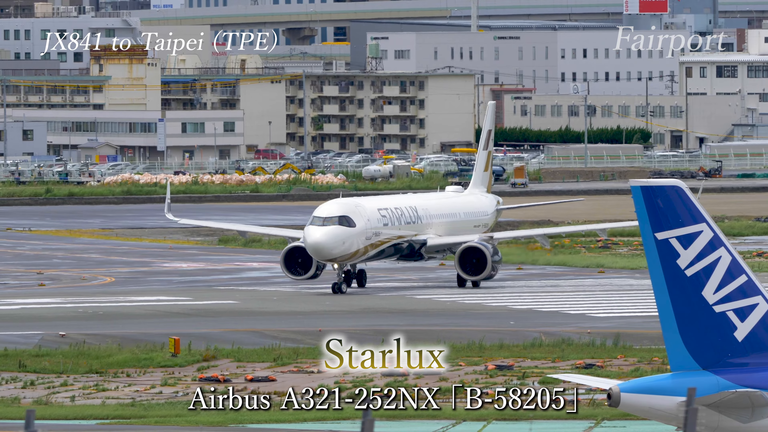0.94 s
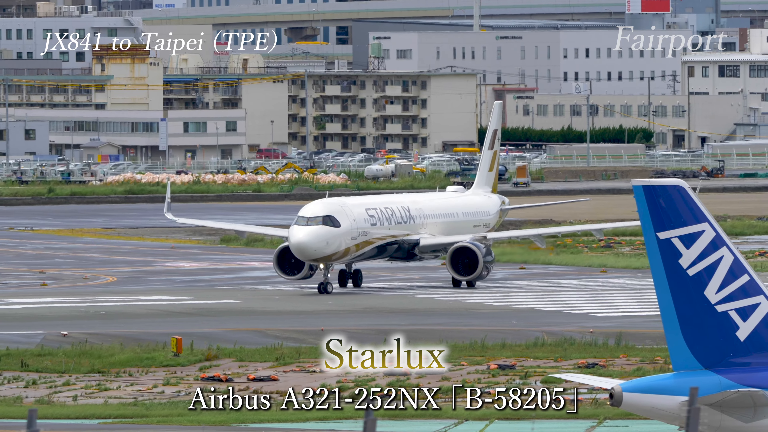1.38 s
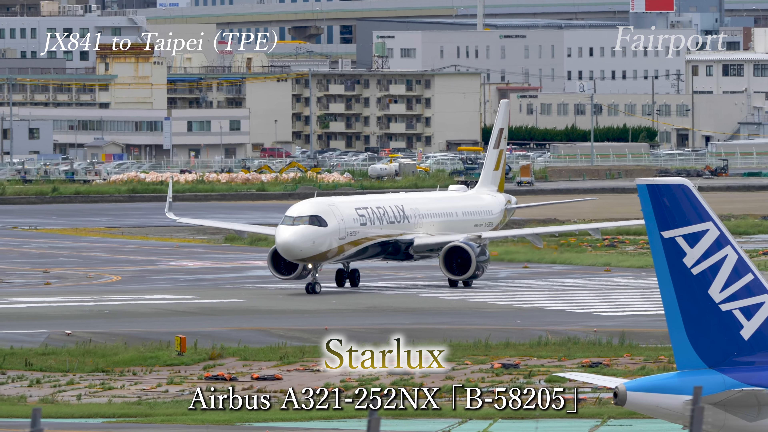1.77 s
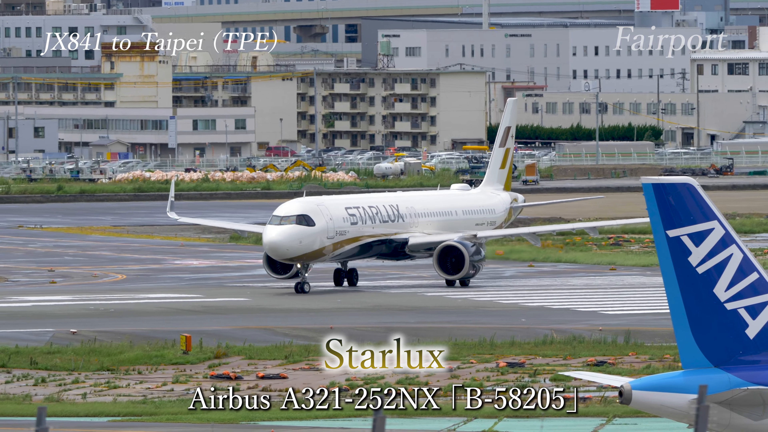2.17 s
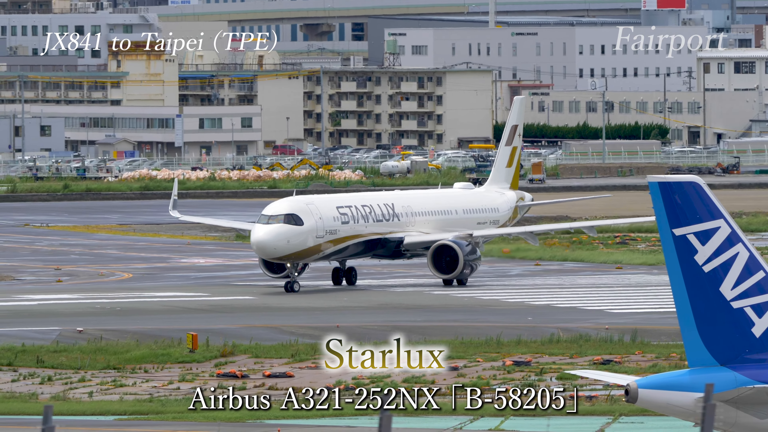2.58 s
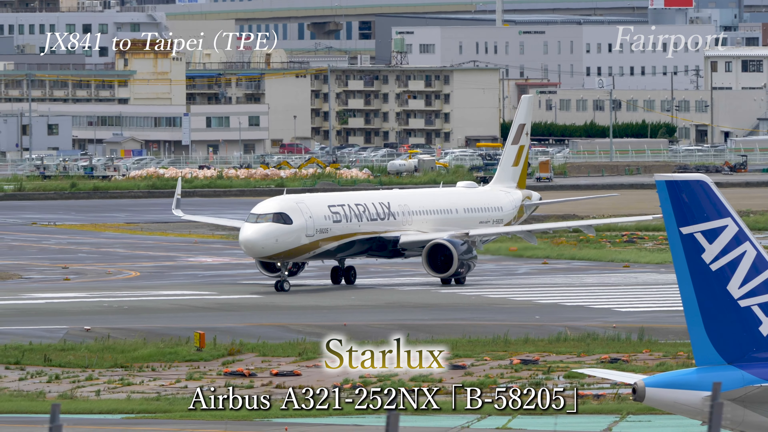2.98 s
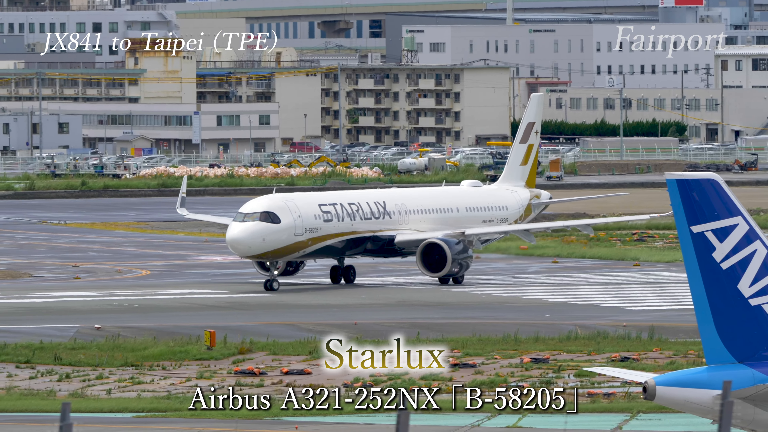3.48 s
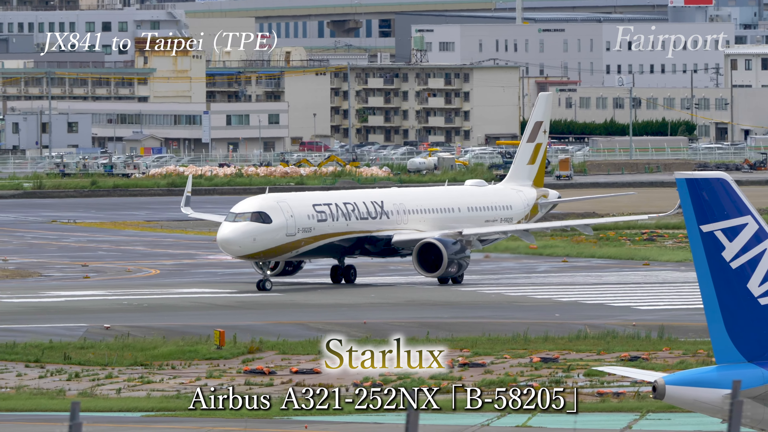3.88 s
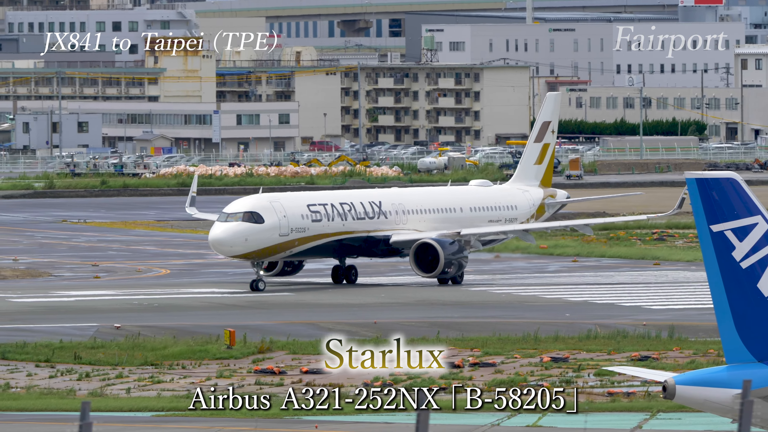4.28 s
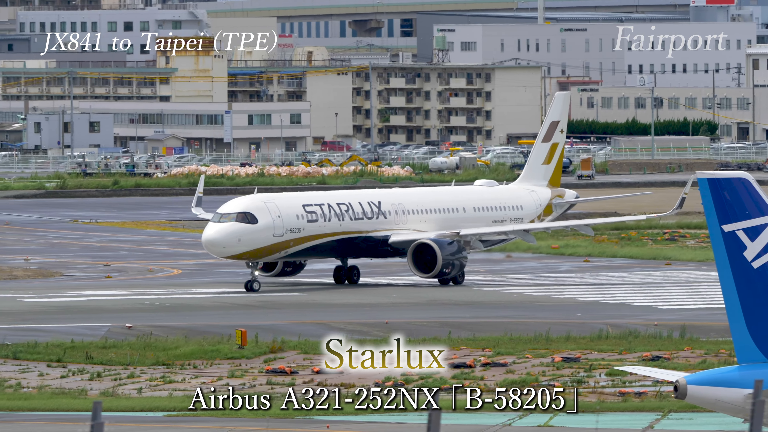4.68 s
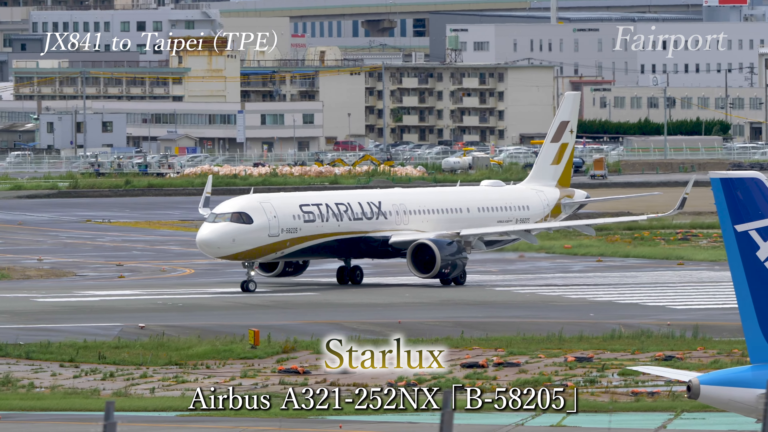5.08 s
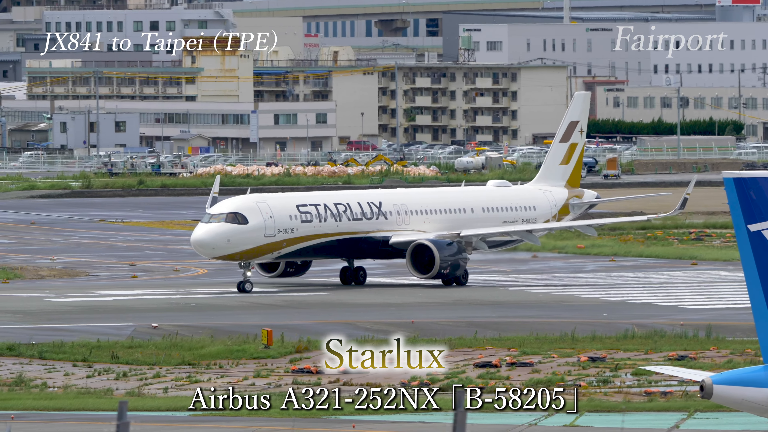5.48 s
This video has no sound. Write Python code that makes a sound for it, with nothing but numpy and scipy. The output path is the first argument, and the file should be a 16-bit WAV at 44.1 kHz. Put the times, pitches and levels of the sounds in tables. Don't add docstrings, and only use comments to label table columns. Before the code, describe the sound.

Outdoor distant stereo pickup of turbofan engines at taxi power: rough roar, bright hiss, wavering hollow howl, flickering whine and a faint low hum. A strong gust flutters and booms in the first second, briefly pushing the jet down. Lighter buffets follow until mid-clip, then the jet noise continues, slightly stronger and hissier at the end, wide and phasey.

```python
import sys
import numpy as np
from scipy import signal
from scipy.io import wavfile
from scipy.ndimage import uniform_filter1d

SR = 44100
rng = np.random.default_rng(int(sys.argv[2]) if len(sys.argv) > 2 else 0)


def to_linear_factor(level_db):
    exponent = np.asarray(level_db, float) / 20
    return 10 ** exponent


def wrap_up_sound(samples):
    columns = np.atleast_2d(samples).T
    tamed = np.clip(columns, -1, 1)
    steps = np.round(tamed * 32767).astype(np.int16)
    wavfile.write(sys.argv[1], SR, steps)


N = 253134


# (time [s], hiss level [dB], roar over hiss [dB])
JET_LOUDNESS = [(0, -22, 1.5), (1.0, -22, -0.5), (1.56, -21.5, 2.3), (2.05, -23, 2), (2.42, -21.5, 3.5),
                (3.04, -20, 0.2), (3.5, -21.5, 4), (3.75, -20.5, 1.5), (4.3, -23, 1.4), (4.96, -21, 3),
                (5.4, -19.5, -0.4), (5.74, -20, 1)]
# (frequency [Hz], density [dB per Hz])
ROAR_SPECTRUM = [(20, -49), (60, -16.5), (160, -10.5), (205, -5.5), (240, -3), (330, -5), (450, 1),
                 (540, 1), (600, 1.5), (720, 0.5), (880, -3), (990, -18), (1300, -15), (3000, -110)]
# (frequency [Hz], density [dB per Hz])
HISS_SPECTRUM = [(500, -50), (1000, -8), (1400, -4), (1750, 0), (2100, -2), (2850, -4), (3200, -7),
                 (4300, -7), (5500, -16), (6800, -27), (7700, -37), (11000, -38), (12000, -49),
                 (14000, -54)]
# (frequency [Hz], likeness [0 to 1])
PORT_COHERENCE = [(60, .35), (200, .52), (520, .63), (720, .36), (880, .22), (1040, .42), (1500, .63),
                  (3000, .65), (6200, .72), (9000, .8)]


def jet():
    hiss_db, roar_over_hiss_db = curves(JET_LOUDNESS)
    roar_duck_share = 0.9
    roar_db = hiss_db + roar_over_hiss_db + roar_duck_share * duck_db()
    hiss_db = hiss_db + duck_db()
    coherence = read(PORT_COHERENCE, np.fft.rfftfreq(2048, 1 / SR))
    roar = to_linear_factor(roar_db - 0.2) * turbulence(ROAR_SPECTRUM, 0.5, coherence)
    hiss = to_linear_factor(hiss_db - 0.01) * turbulence(HISS_SPECTRUM, 1.0, coherence)
    return roar + hiss


# (frequency [Hz], left over right [dB])
PORT_LEAN = [(60, 5), (400, 0), (730, -0.4), (1500, -0.1), (3000, 0.1), (6200, 1.3)]


def turbulence(spectrum, patchy_db, coherence, lead_rad=0.05):
    frames, hz = N // 512 + 5, np.fft.rfftfreq(2048, 1 / SR)
    a, b, c, d, patches = rng.standard_normal((frames, 1025, 5)).T
    patches = uniform_filter1d(patches, size=14, axis=0)
    patches = uniform_filter1d(patches, size=9, axis=1)
    coherence = np.clip(coherence, -1, 1)[:, None]
    left = a + 1j * b
    right = coherence * left * np.exp(1j * lead_rad) + np.sqrt(1 - coherence ** 2) * (c + 1j * d)
    field = np.array([left, right])
    field *= to_linear_factor(read(spectrum, hz)[:, None] + patchy_db * patches / patches.std())
    field *= to_linear_factor(np.multiply.outer([.5, -.5], read(PORT_LEAN, hz)))[:, :, None]
    x = signal.istft(field, nperseg=2048, noverlap=1536)[1][:, :N]
    return x / x.std()


# (time [s], level [dB])
HOWL_LOUDNESS = [(0, -24), (.24, -21.5), (.52, -36), (.78, -24), (1.38, -24), (1.94, -17), (2.1, -18.5),
                 (2.24, -17.5), (2.44, -23), (3.02, -25), (3.4, -21.5), (4.3, -22.5), (4.7, -21.5),
                 (4.98, -26.5), (5.2, -16), (5.38, -31.5), (5.58, -17), (5.74, -22)]
# (time [s], differing over shared [dB], lead of the shared part [rad])
HOWL_BEARING_CURVE = [(0, -5.5, -2), (.3, -8, -2.5), (.58, -17, -3.2), (.8, -7.5, -2.5), (1.4, -9, -1),
                      (2.3, -3.5, -2), (3.1, 4, -1.3), (3.9, 8, -1.7), (4.3, 6.5, -3), (4.65, -5, -2),
                      (5.74, -2, -2.5)]


def fan_howl():
    (howl_db,), (differing_over_db, lead_rad) = curves(HOWL_LOUDNESS), curves(HOWL_BEARING_CURVE)
    shared_db = howl_db - 10 * np.log10(1 + to_linear_factor(differing_over_db) ** 2)
    levels_db = (shared_db, shared_db + differing_over_db)
    return fan_tone(648.0, levels_db, lead_rad, trims_db=(1.5, 2.6), scatter=.4, width_hz=13)


# (time [s], half length [s], shared rise [dB], differing rise [dB])
WHINE_SWELLS = [(.08, 0.15, 3, 0), (.6, .06, -2, 10), (.88, 0.2, -4, 7.5), (1.13, 0.095, 2, 12.5),
                (1.6, 0.12, 1, 4), (2.2, .25, -7, -1.5), (2.56, .12, 2, 8), (2.83, .09, -3, 6),
                (3.15, 0.055, -1, 8), (3.38, 0.067, 5, 7), (3.72, 0.11, 0, 12.5), (3.97, 0.13, 3, 16),
                (4.12, 0.048, 8, 6), (4.42, 0.11, -2, 7.5), (4.75, .12, 5, 2), (4.9, 0.075, 0, 7),
                (5.16, 0.15, 1, -6), (5.6, 0.22, 4, 1.5)]


def blade_whine():
    sag_from_s, sag_hz_per_s = 4.0, 5.5
    blades_hz = 2803.5 - sag_hz_per_s * np.maximum(np.arange(N) / SR - sag_from_s, 0)
    levels_db = swells(WHINE_SWELLS, (-36, -47.5))
    return fan_tone(blades_hz, levels_db, 2.1, trims_db=(1.8, 4.2), scatter=.45, width_hz=12)


# (time [s], half length [s], shared rise [dB], differing rise [dB])
HUM_SWELLS = [(.15, 0.077, 12, 11), (.42, 0.083, 8, 15.5), (.95, 0.24, 11, 2.5), (1.45, 0.24, 15, 10),
              (2.15, 0.32, -1, 9), (2.55, 0.22, -6, -2.5), (3.03, .2, 7, 6), (4.9, 0.42, 3, -8)]


def gear_hum():
    levels_db = swells(HUM_SWELLS, (-46.5, -45.5))
    return fan_tone(291.2, levels_db, 2.3, trims_db=(1.2, 1.2), scatter=.9, width_hz=14)


def fan_tone(hz, levels_db, lead_rad, trims_db, scatter, width_hz):
    shared_db, differing_db = levels_db
    wander = .0012 * slow(1.5).real
    turn = np.exp(2j * np.pi * np.cumsum(hz * (1 + wander)) / SR)
    shared = to_linear_factor(shared_db + trims_db[0]) * turn * np.exp(1j * lead_rad) * (1 + scatter * slow(width_hz))
    differing = to_linear_factor(differing_db + trims_db[1]) * turn * (1 + scatter * slow(width_hz))
    return np.sqrt(2 / (1 + scatter ** 2)) * np.array([shared + differing, shared - differing]).real


def swells(rows, rest_db):
    t = np.arange(N) / SR
    rises = sum(np.outer(rise_db, np.exp(-((t - s) / half_s) ** 2)) for s, half_s, *rise_db in rows)
    return np.array(rest_db)[:, None] + rises + duck_db()


# (frequency [Hz], level [dB], width [Hz], likeness of the ports [-1 to 1])
STEADY_ORDERS = [(67, -43, 4, -.3), (212, -39, 4, .8), (536, -36, 8, .5), (822, -41, 8, .2),
                 (1762, -41, 12, .7), (2928, -46, 10, .1), (7511, -67, 14, .7), (9400, -66, 14, .55),
                 (10650, -75, 14, .9), (11292, -73, 12, .9)]
# (time [s], frequency [Hz])
SPOOL_DOWN = [(0, 4990), (2.6, 4975), (3.4, 4950), (4.1, 4900), (4.7, 4875), (5.2, 4850), (5.74, 4815)]
# (multiple [1], level [dB], width [Hz], likeness of the ports [-1 to 1])
SPOOL_HARMONICS = [
    (1, -57, 20, .7),
    (2, -63, 60, .62),
    (3, -71, 260, .93),
]


def orders():
    hiss_db = curves(JET_LOUDNESS)[0] + duck_db()
    spool_hz, = curves(SPOOL_DOWN)
    lines = sum(fuzzy_line(*row) for row in STEADY_ORDERS)
    lines += sum(fuzzy_line(multiple * spool_hz, *rest) for multiple, *rest in SPOOL_HARMONICS)
    return lines * to_linear_factor(hiss_db - hiss_db.mean())


def fuzzy_line(hz, db, width_hz, likeness):
    left, likeness = slow(width_hz), np.clip(likeness, -1, 1)
    right = likeness * left + np.sqrt(1 - likeness ** 2) * slow(width_hz)
    turn = np.exp(2j * np.pi * np.cumsum(hz * np.ones(N)) / SR)
    return to_linear_factor(db) * np.sqrt(2) * (np.array([left, right]) * turn).real


# (time [s], pressure shared by the ports [dB])
WIND_STRENGTH = [(0, -30), (.42, -8), (.8, -24), (1.1, -31), (1.25, -18), (1.55, -28), (1.72, -24.5),
                 (2.1, -27.5), (2.94, -47), (3.6, -45), (3.82, -31.5), (4.04, -47), (4.86, -46),
                 (5.05, -39), (5.74, -29.5)]
# (frequency [Hz], density [dB per Hz])
WIND_SPECTRUM = [(10, -36), (25, -19), (50, -4), (80, 0), (95, -4), (115, -10), (145, -18), (220, -21),
                 (400, -32), (2000, -120)]
# (time [s], peak [dB], frequency [Hz], rise [s])
SHARED_BUFFETS = [(.2500, -2.5, 68, .008), (.381, -2, 72, .011), (.4085, -9, 84, .008),
                  (.431, -1.5, 82, .009), (.468, -6, 74, .011), (.524, -9, 70, .011), (.578, -11, 70, .011),
                  (.795, -14, 60, .01), (1.19, -16, 65, .01), (1.685, -16, 75, .01), (1.755, -11, 75, .009),
                  (2.6, -21, 70, .01)]
# (time [s], peak [dB], frequency [Hz], rise [s])
DIFFERING_BUFFETS = [(.232, -28, 69.5, 0.015), (.425, -25, 76, 0.01), (.475, -18, 85, 0.0066),
                     (.79, -24, 87, 0.0064), (1.1, -28, 66.3, 0.029), (1.31, -23.5, 90, 0.01),
                     (1.675, -21, 93, 0.015), (2.005, -27, 61.5, 0.011), (2.12, -32, 55.4, 0.014),
                     (2.44, -28, 54, .016), (2.585, -21, 72, 0.0063)]


def wind():
    shared_db, = curves(WIND_STRENGTH)
    calm_db, gust_share = -42.5, 0.63
    differing_db = calm_db + gust_share * (shared_db - calm_db)
    shared, differing = (fill_lulls(v) for v in turbulence(WIND_SPECTRUM, 1.5, np.zeros(1025)))
    steady_db = np.minimum(shared_db - 0.7, -23)
    shared = to_linear_factor(steady_db) * evened(shared) + buffets(SHARED_BUFFETS)
    differing = to_linear_factor(differing_db - 7.0) * evened(differing) + buffets(DIFFERING_BUFFETS)
    return np.array([shared + differing, shared - differing])


def fill_lulls(x, evenness=.3):
    return x / (uniform_filter1d(x ** 2, size=4000) + .05) ** (evenness / 2)


def buffets(rows):
    t, out = np.arange(N) / SR, np.zeros(N)
    for s, db, hz, rise_s in rows:
        u = np.maximum(t - s, 0)
        envelope = u / rise_s * np.exp(1 - u / rise_s)
        out -= to_linear_factor(db) * envelope * np.sin(2 * np.pi * hz * u)
    return out


def duck_db():
    deepest_s, fall_s, recovery_s, depth_db = 0.5, 0.16, 0.17, -9.5
    u = np.arange(N) / SR - deepest_s
    return depth_db * np.exp(-abs(u / np.where(u < 0, fall_s, recovery_s)) ** 1.1)


def evened(x):
    return x / np.sqrt(np.mean(x ** 2, axis=-1, keepdims=True) + 1e-20)


def read(points, hz):
    f, value = np.transpose(points)
    return np.interp(np.log(hz + 1), np.log(f + 1), value)


def curves(rows):
    s, *columns = np.transpose(rows)
    return [np.interp(np.arange(N) / SR, s, column) for column in columns]


def slow(width_hz):
    r = np.exp(-np.pi * width_hz / SR)
    z = rng.standard_normal(N + SR) + 1j * rng.standard_normal(N + SR)
    z = signal.lfilter([1], np.convolve([1, -r], [1, -r]), z)[SR:]
    return z / np.sqrt(np.mean(abs(z) ** 2))


def scene():
    return jet() + fan_howl() + blade_whine() + gear_hum() + orders() + wind()


def band_limit(x):
    return signal.sosfilt(signal.butter(12, 15170, fs=SR, output="sos"), x)


def record(dry):
    wired = dry * np.array([[1], [-1]])
    mix = np.clip(wired, -1, 1)
    return band_limit(mix)


dry = scene()
out = record(dry)
wrap_up_sound(out)
```